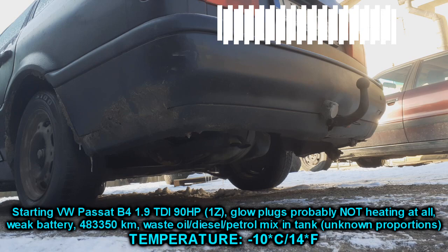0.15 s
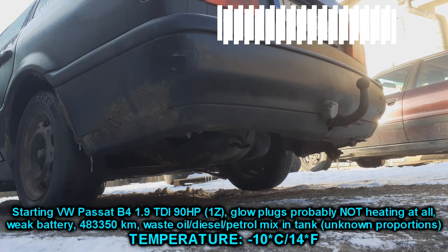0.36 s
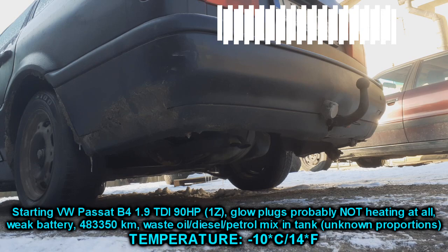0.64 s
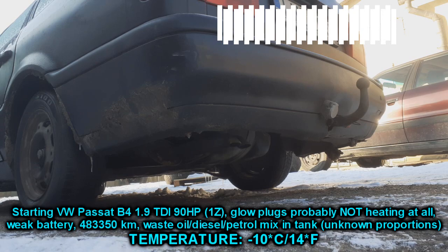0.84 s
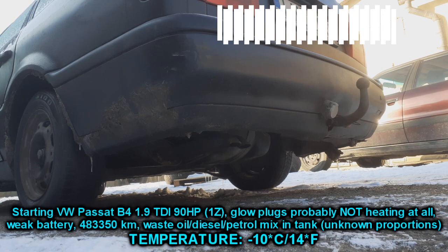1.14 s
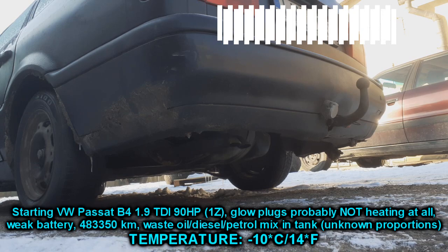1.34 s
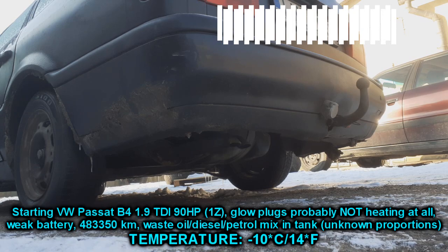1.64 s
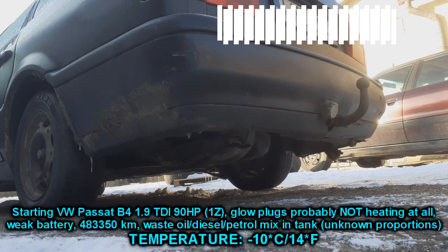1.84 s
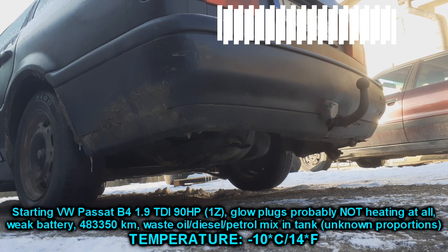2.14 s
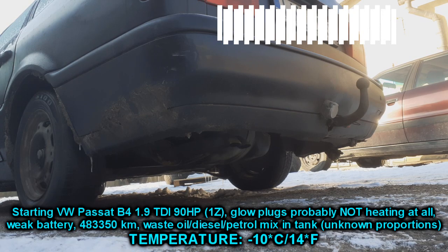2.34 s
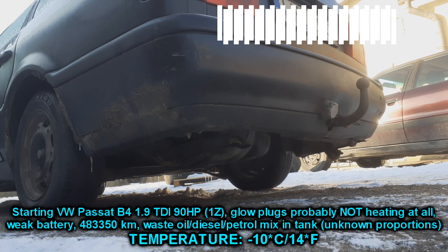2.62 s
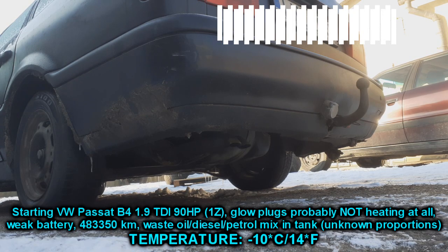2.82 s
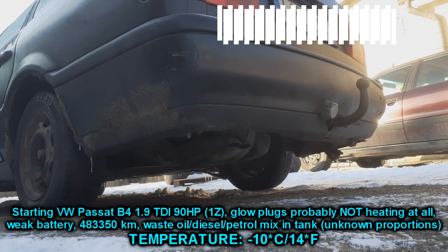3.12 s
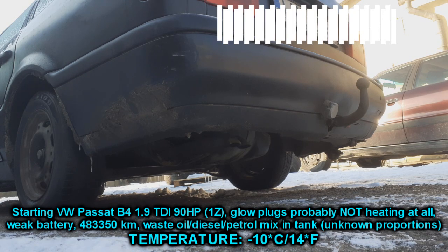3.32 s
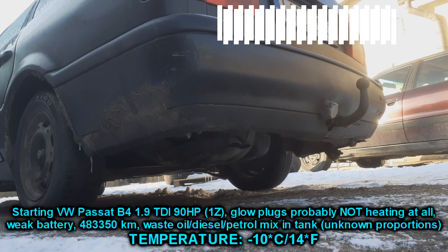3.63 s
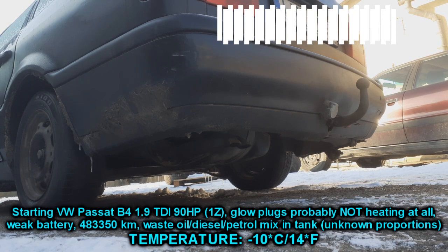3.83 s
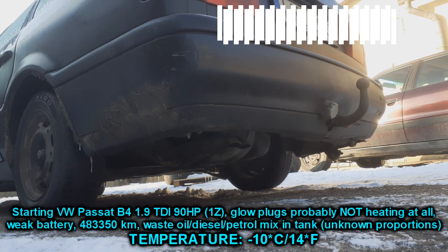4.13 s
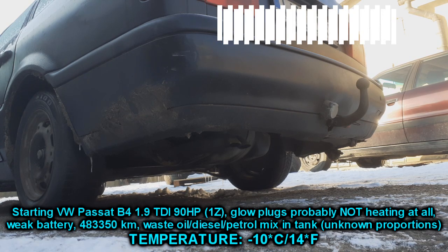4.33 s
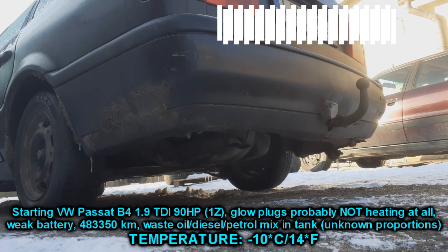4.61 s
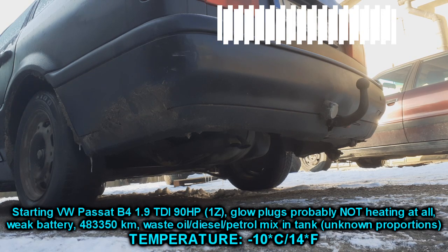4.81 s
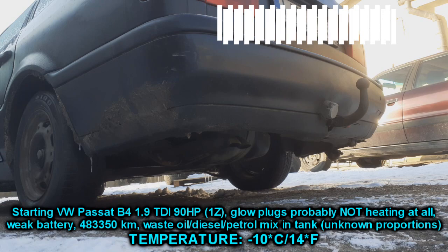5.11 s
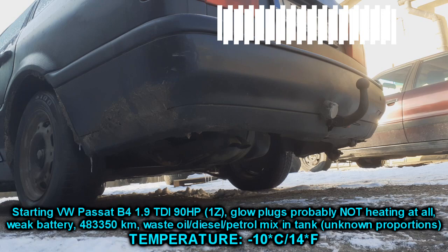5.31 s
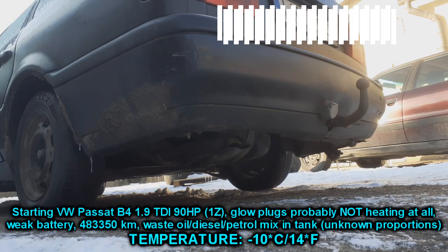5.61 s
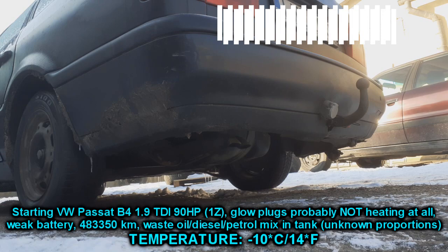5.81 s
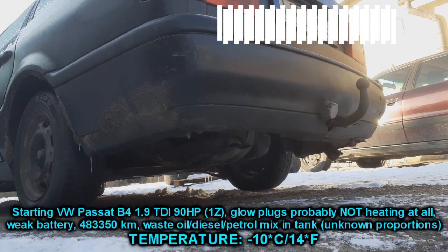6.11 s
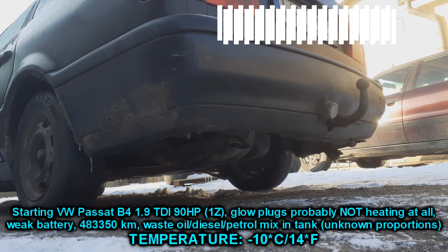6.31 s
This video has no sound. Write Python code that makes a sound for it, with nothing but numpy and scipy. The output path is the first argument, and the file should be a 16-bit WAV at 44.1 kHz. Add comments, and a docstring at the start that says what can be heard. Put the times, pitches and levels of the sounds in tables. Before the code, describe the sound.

Heard outdoors from low behind a diesel car, faint traffic hums while someone shifts about in the cabin with dull bumps and rustles. Keys tick in the ignition. The starter suddenly clacks in and turns the cold engine over in loud, slow, laboured pulses, its gears grinding and a thin whine rising and falling, without the engine ever firing.

```python
"""Dull knocks, rustling and key clicks from the cabin of a frozen diesel car, heard low behind its bumper.
Then the starter pinion slams into the ring gear and cranks slowly. Each compression loads and slows
the gears, which grind loudly and ring the block, then spin up again with a thin whine.
Distant traffic murmurs throughout."""
import sys
import numpy as np
from scipy import signal
from scipy.fft import rfft, irfft, next_fast_len
from scipy.io import wavfile
from scipy.ndimage import map_coordinates

SR = 44100
rng = np.random.default_rng(int(sys.argv[2]) if len(sys.argv) > 2 else 0)


def log_audio(samples):
    """Write samples as a 16-bit WAV file to the path given in sys.argv[1]."""
    # one column per channel
    frames = np.atleast_2d(samples).T
    # limit to full scale, then quantise
    limited = np.clip(frames, -1, 1)
    pcm = np.round(limited * 32767).astype(np.int16)
    wavfile.write(sys.argv[1], SR, pcm)


N = 284533
TIME_S = np.arange(N) / SR


# turning engine: freq_hz, gain_db
ENGINE_SPECTRUM = [(25, -28), (60, 0), (130, -3), (185, 2), (360, 0), (600, -7), (1000, -37.5)]

def starter():
    """Cranking: tooth rate and gear load drive grind and whine; the rumble follows the load."""
    tooth_hz = crank_speed()
    load_db = gear_load(onset_s=0.004, drop_s=0.019)
    running = amp(curve([(4.525, -57), (4.56, -1), (4.58, 3), (6.5, 3.5)], outside=-120))
    teeth = np.cumsum(tooth_hz * (1 + 0.008 * wobble(150))) / SR
    speed_db = 20 * np.log10(tooth_hz / np.median(tooth_hz[running > 0.5]))
    rumble = amp(-58.5 + 0.36 * load_db) * noise(ENGINE_SPECTRUM)
    gears = grind(teeth, tooth_hz, load_db, speed_db) + whine(teeth, load_db, speed_db)
    return running * (gears + rumble) + clacks()


# unloaded starter speed, with early overshoot: time_s, tooth_hz
UNLOADED_SPEED = [(4.55, 60), (4.65, 295.9), (4.68, 364.4), (4.712, 379), (4.77, 351.4), (4.83, 322.2),
                  (5.15, 328.4), (6.45, 334.6)]
# gear loads, the pinion engaging first, then the compression strokes:
# bite_s, peak_s, release_s, speed_loss_ratio, bite_load_db, release_load_db
GEAR_LOADS = [(4.577, 4.6, 4.69, 0.03, 7, 0.5), (4.817, 5.055, 5.066, 0.55, 6.5, 7.5),
              (5.153, 5.3, 5.353, 0.47, 11, 5), (5.406, 5.555, 5.559, 0.44, 9, 7),
              (5.653, 5.772, 5.822, .46, 10, 6), (5.911, 6.06, 6.068, .46, 9.5, 6),
              (6.182, 6.32, 6.35, 0.44, 9.5, 5.5), (6.424, 6.58, 6.9, 0.54, 5, 14)]

def crank_speed(squeeze_power=2.1, recover_s=0.062):
    """Tooth rate in Hz: each load brakes the starter up to its peak, then lets it recover."""
    tooth_hz = curve(UNLOADED_SPEED)
    for bite_s, peak_s, _, loss, _, _ in GEAR_LOADS:
        squeeze = np.clip((TIME_S - bite_s) / (peak_s - bite_s), 0, 1) ** squeeze_power
        easing = np.exp(-(np.maximum(TIME_S - peak_s, 0) / recover_s) ** 2)
        tooth_hz *= 1 - loss * squeeze * easing
    return tooth_hz


def gear_load(onset_s, drop_s):
    """Load in dB: snaps on as the gears bite, drops as they let go."""
    load_db = np.zeros(N)
    for bite_s, _, release_s, _, first_db, last_db in GEAR_LOADS:
        onset = np.clip((TIME_S - bite_s) / onset_s + 0.5, 0, 1)
        release = np.clip((release_s - TIME_S) / drop_s + 0.5, 0, 1)
        load_db += onset * release * np.interp(TIME_S, [bite_s, release_s], [first_db, last_db])
    return load_db


def groan_gain(lead_s=0.019):
    """The groan builds until just before release, stronger the harder the load brakes."""
    return sum(loss * swell(release_s - lead_s, rise_s=0.33, fade_s=0.014, level_db=-29.5)
               for _, _, release_s, loss, _, _ in GEAR_LOADS)


# grinding gears: freq_hz, gain_db
GRIND_SPECTRUM = [(18, -41), (30, -12), (59, -6), (117, -14), (188, -3), (318, -3), (413, -8), (509, -5),
                  (883, -7), (1790, -20), (3540, -23.5), (6830, -34), (8870, -52), (12500, -38),
                  (15800, -45)]
# engine block and underbody resonances: freq_hz, width_hz, boost_db
BLOCK_MODES = [(56, 11, 4), (113.4, 4.7, 2), (161, 30, 3), (197, 20, 3.5), (268, 11, 4), (343.6, 39, 7),
               (507.6, 6.5, 10), (698, 16, 6), (753, 10, 8), (885, 64, 6), (1015, 29, 9.5), (1206, 12, 5),
               (2425, 17, 8), (2670, 27, 9)]

def grind(teeth, tooth_hz, load_db, speed_db):
    """Gear teeth hammer and scrape, ringing the block and underbody."""
    contacts = np.diff(np.floor(teeth), prepend=0)
    hits = contacts * amp(3.8 * rng.standard_normal(N)) * np.sqrt(SR / tooth_hz)
    pressure = unit(np.exp(-1.2 * (teeth % 1)) * amp(0.61 * wobble(110)))
    scrape = pressure * rng.standard_normal((2, N))
    force = unit(0.22 * scattered(hits, t60_s=0.05) + scrape)
    # load governs the low grind; the bright rasp also needs speed
    low_band = [(1100, -1), (1700, -10.5), (3000, -37.5)]
    rasp_band = [(700, -30), (1300, 4.5), (2000, 1), (4500, 2), (9000, -0.5), (13000, 0.5)]
    low = coloured(force * amp(load_db - 0.028 * speed_db), low_band)
    rasp = coloured(unit(scrape[::-1]) * amp(0.78 * load_db + 0.91 * speed_db - 0.3), rasp_band)
    filter_rms = np.std(coloured(rng.standard_normal(N), GRIND_SPECTRUM, BLOCK_MODES))
    return amp(-45.5) * coloured(low + rasp, GRIND_SPECTRUM, BLOCK_MODES) / filter_rms


# mesh tones: tooth_rate_multiple, free_db, whine_db, groan_db
MESH_ORDERS = [(2, 0.5, -6.5, -8), (3, -18, -6, -6.5), (4, -1, -6.5, -3), (8, -3, -6, -37),
               (12, -12, -2, -48)]
# starter housing: freq_hz, gain_db
HOUSING_SPECTRUM = [(150, -51), (320, 8.5), (450, -32), (650, 1.5), (760, -3), (900, 0), (1050, -6),
                    (1250, -4), (1500, -3.5), (1700, -6), (2000, -9), (2600, -9), (3000, -10), (3200, -24),
                    (3520, 1.5), (3750, -18), (5000, -55)]

def whine(teeth, load_db, speed_db, free_spin_s=4.735, free_width_s=0.046):
    """Mesh tones through the housing: singing when free, thin when fast, groaning under load."""
    free = amp(-41) * np.exp(-((TIME_S - free_spin_s) / free_width_s) ** 4)
    spin = amp(-46.5 + 0.18 * load_db + 0.93 * np.minimum(speed_db, 0))
    strain = groan_gain()
    shaken_teeth = teeth + 0.014 * wobble(260)  # gear play roughens the high orders most
    tones = np.zeros(N)
    for order, free_db, whine_db, groan_db in MESH_ORDERS:
        gain = free * amp(free_db) + spin * amp(whine_db) + strain * amp(groan_db)
        chatter = amp(4.86 * wobble(110) - 4.5)
        tones += gain * chatter * np.sin(2 * np.pi * order * shaken_teeth + 0.5 * wobble(110))
    direct, echo = scattered(coloured(tones, HOUSING_SPECTRUM), t60_s=0.064)
    bounce = 0.89 * np.roll(echo, SR // 100)  # off a nearby car; beats against the gliding tones
    return np.array([direct + bounce, echo])


# starter clacks, the solenoid and the pinion striking: start_s, level_db
STARTER_CLACKS = [(4.566, -42), (4.5756, -31), (4.59, -31), (4.821, -35.5), (4.8368, -33.5), (5.1507, -48),
                  (5.4056, -43), (5.6571, -36.5), (5.9175, -38), (6.118, -44.5), (6.1809, -49)]

def clacks():
    """The solenoid clacks, the pinion slams into the ring gear, and again as the backlash closes."""
    steel = [(400, -10), (1200, 2), (2600, 2), (4000, -3), (7000, -9.5), (9000, -30),
             (12500, -13.5), (16000, -26)]
    out = np.zeros((2, N))
    for start_s, level_db in STARTER_CLACKS:
        strike = burst(steel, t60_s=0.074, tail_db=-22, tail_t60_s=0.32, attack_s=0.00088)
        add(out, start_s, amp(level_db - 8) * strike)
    return out


# cabin blows: start_s, level_db, boom_db, rap_db
CABIN_BLOWS = [(0.536, -46.5, -4, -27), (0.587, -42, -7, -11), (0.614, -43, -9, -18),
               (0.667, -54.5, 8.5, 3), (0.707, -31, -24, -16), (0.723, -37.5, -11.5, -31),
               (0.931, -48.5, -23.5, -24), (0.957, -47.5, -13, -29), (1.008, -52.5, 2, -27),
               (1.24, -40.5, -7.5, -44), (1.39, -46.5, -11, -27), (1.611, -39, -7, -22),
               (1.639, -30.5, -20.5, -29), (2.117, -50, -35, -8), (2.792, -50.5, -6.5, -16),
               (3.584, -36.5, -9.5, -22), (3.648, -28.5, -30, -17), (3.663, -33, -13.5, -30),
               (3.794, -33.5, -5.5, -21.5), (3.816, -29, -17, -19), (3.842, -32, -8.5, -25)]
# body panels, low boom, hollow rap: freq_hz, gain_db
PANEL_SPECTRUM = [(50, -26), (110, -5), (190, 3), (260, 5.5), (340, 2), (450, -1), (620, -1.5), (760, -12),
                  (1000, -23), (1300, -50), (2400, -86)]
BOOM_SPECTRUM = [(25, -43.5), (55, -9), (80, -3.5), (115, -4), (170, -8), (400, -63)]
RAP_SPECTRUM = [(400, -41), (750, 6.5), (1050, 11), (1400, 2.5), (1900, -15.5), (2700, -12.5), (5000, -48),
                (9000, -61)]
# cabin panel resonances: freq_hz, width_hz, boost_db
CABIN_MODES = [(114.4, 11, 8), (246.5, 23, 4), (346.5, 30, 8), (459, 24, 7), (637, 80, 0.5), (977, 66, 0),
               (1405, 110, 8.5), (1750, 66, 11), (2067, 100, 11.5)]

def knocks():
    """Padded blows ring the body panels, with a boom below and a hollow rap above."""
    out = np.zeros((2, N))
    for start_s, level_db, boom_db, rap_db in CABIN_BLOWS:
        panels = burst(PANEL_SPECTRUM, CABIN_MODES,
                       t60_s=0.065, tail_db=-13.5, tail_t60_s=0.31, attack_s=0.0015)
        boom = burst(BOOM_SPECTRUM, CABIN_MODES, t60_s=0.1, tail_db=-6, tail_t60_s=0.52, attack_s=0.0026)
        rap = burst(RAP_SPECTRUM, CABIN_MODES,
                    t60_s=0.13, tail_db=-19.5, tail_t60_s=0.48, attack_s=0.0023)
        blow = amp(-2) * panels + amp(boom_db - 2.5) * boom + amp(rap_db - 4) * rap
        add(out, start_s, amp(level_db) * blow)
    return out


# key clicks: start_s, level_db, ping_db, lock_db
KEY_CLICKS = [(2.0354, -61, -5, -6), (2.0705, -58, -10, -1), (2.102, -54.5, -16, -1.5),
              (2.1211, -50, -5.5, 1), (2.3276, -53.5, -5, 0), (2.7928, -59.5, -20, -0.5),
              (2.97, -64.5, 4, -2), (3.016, -59.5, 6.5, 0.5), (3.085, -52, -2, -11), (3.576, -60, 1, -5),
              (4.139, -53, -30, -11), (4.339, -56.5, -6, 1), (4.362, -55, -5, 0.5), (4.385, -49.5, 0, -7.5)]
# key tick, ignition lock, high ping: freq_hz, gain_db
TICK_SPECTRUM = [(3000, -37), (5200, -5.5), (6600, 1.5), (7700, -5.5), (9200, -37)]
LOCK_SPECTRUM = [(500, -10), (1200, -1), (1800, -12.5), (2700, -8.5), (3800, 0), (5500, -6.5), (7800, -14),
                 (9200, -55), (12400, -34)]
PING_SPECTRUM = [(8000, -50), (11000, -6), (13500, 1), (16000, -1.5)]

def keys():
    """Keys tick, ping and knock the lock, each click with resonances of its own."""
    out = np.zeros((2, N))
    for start_s, level_db, ping_db, lock_db in KEY_CLICKS:
        modes = [(hz, 500, 4) for hz in rng.uniform(3360, 7400, size=3)]
        tick = burst(TICK_SPECTRUM, modes, t60_s=0.022, tail_db=-15, tail_t60_s=0.2, attack_s=0.0004)
        lock = burst(LOCK_SPECTRUM, modes, t60_s=0.024, tail_db=-10.5, tail_t60_s=0.28)
        ping = burst(PING_SPECTRUM, t60_s=0.022, tail_db=-13.5, tail_t60_s=0.24)
        click = amp(-5.5) * tick + amp(lock_db - 6.5) * lock + amp(ping_db - 3) * ping
        add(out, start_s, amp(level_db) * click)
    return out


# clothing brushes: peak_s, rise_s, fade_s, level_db, hiss_db
CLOTH_BRUSHES = [(0.626, 0.068, 0.077, -64, -14), (0.672, 0.018, 0.088, -65.5, -9),
                 (1.242, 0.032, 0.046, -74, 2), (1.315, 0.092, .15, -79, 8), (1.378, 0.02, 0.082, -60, -24),
                 (1.61, 0.45, 0.13, -67, -5)]
# rubbing cloth and its fine hiss: freq_hz, gain_db
CLOTH_SPECTRUM = [(590, -52), (1000, 1), (1150, -6), (1720, -20), (2050, -6.5), (3100, -10), (4190, -5),
                  (6570, -3), (8570, -26), (13400, -15), (15800, -15)]
HISS_SPECTRUM = [(8000, -45), (11000, -10), (13500, 0), (15800, -7)]

def clothes():
    """Brushing cloth rustles, with a fine hiss on top."""
    rubbing = swells(row[:-1] for row in CLOTH_BRUSHES)
    hissing = swells((*timing, level_db + hiss_db) for *timing, level_db, hiss_db in CLOTH_BRUSHES)
    flicker = amp(0.5 + 1.2 * wobble(120))
    return flicker * (rubbing * noise(CLOTH_SPECTRUM) + hissing * noise(HISS_SPECTRUM))


# weight shifts: peak_s, rise_s, fade_s, level_db
WEIGHT_SHIFTS = [(0.61, 0.11, .25, -52.5), (0.955, 0.11, 0.12, -58.5), (1.27, 0.1, 0.31, -57.5),
                 (1.35, 0.074, 0.13, -57.5), (1.66, .55, 0.11, -57), (2.84, .07, 0.07, -64),
                 (3.6, 0.42, 0.31, -59), (3.87, .15, 0.23, -48.5)]

def seat():
    """Shifting weight shakes the seat."""
    shaking = amp(2.2 * wobble(35)) * swells(WEIGHT_SHIFTS)
    return shaking * (noise(PANEL_SPECTRUM) + amp(-13) * noise(BOOM_SPECTRUM))


# trim squeaks: start_s, length_s, start_hz, end_hz, level_db
TRIM_SQUEAKS = [(0.542, 0.046, 960, 996, -57), (1.376, 0.102, 1125, 1197, -62)]

def trim():
    """Plastic trim squeaks in short, rough, rising tones."""
    out = np.zeros(N)
    for start_s, length_s, start_hz, end_hz, level_db in TRIM_SQUEAKS:
        count = int(length_s * SR)
        pitch_hz = np.linspace(start_hz, end_hz, count) * (1 + 0.035 * wobble(302)[:count])
        phase = 2 * np.pi * np.cumsum(pitch_hz) / SR
        grip = np.hanning(count) * amp(3 * wobble(139)[:count])
        add(out, start_s, amp(level_db) * grip * (np.sin(phase) + 0.13 * np.sin(2 * phase)))
    return scattered(out, t60_s=0.074)


# traffic murmur, tyre noise: freq_hz, gain_db
MURMUR_SPECTRUM = [(15, -45), (25, -11.5), (70, -3), (126, -4.5), (144, -5.5), (179, -1.5), (276, -3.5),
                   (361, -3.5), (572, -10), (620, -10.5), (1010, -31.5), (1640, -33), (5670, -34.5),
                   (7630, -44), (15800, -29)]
TYRE_SPECTRUM = [(500, -38.5), (850, -2), (1030, -5), (1250, -17), (2000, -42)]
# passing tyres: peak_s, rise_s, fade_s, level_db
TYRE_PASSES = [(2.55, 0.22, .4, -74), (3.5, 0.34, 2.4, -73)]
# far whir: time_s, pitch_hz
WHIR_PITCH = [(2.15, 739), (2.4, 717), (2.95, 770), (3.2, 896), (3.55, 922)]

def street():
    """Far traffic: a low murmur over faint hiss, tyres that swell and fade, a faint rising whir."""
    murmur = amp(-64.5 + 0.11 * wobble(2.9)) * noise(MURMUR_SPECTRUM)
    tyres = np.hypot(amp(-88.5), swells(TYRE_PASSES)) * noise(TYRE_SPECTRUM)
    phase = 2 * np.pi * np.cumsum(curve(WHIR_PITCH) * (1 + 0.02 * wobble(120))) / SR
    whir = swell(3.3, rise_s=3.9, fade_s=4.0, level_db=-78) * amp(3.4 * wobble(14)) * np.sin(phase)
    return murmur + tyres + scattered(whir, t60_s=0.2)


def amp(db):
    """Decibels to gain."""
    return 10 ** (np.asarray(db) / 20)


def unit(x):
    """x at rms 1."""
    return x / np.sqrt(np.mean(x ** 2) + 1e-20)


def along(points, hz):
    """(freq_hz, value) points interpolated on a log axis."""
    points_hz, values = np.transpose(points)
    return np.interp(np.log(hz + 1), np.log(points_hz + 1), values)


def curve(rows, outside=None):
    """(time_s, value) rows as one value per sample."""
    return np.interp(TIME_S, *np.transpose(rows), left=outside, right=outside)


def wobble(rate_hz):
    """Smooth random curve, rate_hz knots a second."""
    knots = rng.standard_normal(int(N * rate_hz / SR) + 4)
    return map_coordinates(knots, [TIME_S * rate_hz])


def swell(peak_s, rise_s, fade_s, level_db):
    """Gain that climbs 20 dB per rise_s up to peak_s, then sinks 20 dB per fade_s."""
    t = TIME_S - peak_s
    return amp(level_db - 20 * np.maximum(-t / rise_s, t / fade_s))


def swells(rows):
    """Power sum of overlapping swells."""
    return np.sqrt(sum(swell(*row) ** 2 for row in rows))


def coloured(x, spectrum, modes=()):
    """Minimum-phase filter: a broad (freq_hz, gain_db) spectrum with resonances on top."""
    size = 2 * next_fast_len(x.shape[-1] // 2 + 4096)
    hz = np.fft.rfftfreq(size, 1 / SR)
    modes_db = sum(boost_db / (1 + (2 * (hz - mode_hz) / width_hz) ** 2)
                   for mode_hz, width_hz, boost_db in modes)
    cepstrum = irfft(np.log(amp(along(spectrum, hz) + modes_db)))
    cepstrum[1:size // 2] *= 2
    cepstrum[size // 2 + 1:] = 0
    return irfft(rfft(x, size) * np.exp(rfft(cepstrum)), size)[..., :x.shape[-1]]


def noise(spectrum):
    """Direct and scattered noise at rms 1."""
    return unit(coloured(rng.standard_normal((2, N)), spectrum))


def scattered(x, t60_s):
    """Two rows: x and its echo from the ground and nearby cars."""
    t = np.arange(SR // 4) / SR
    tail = rng.standard_normal(len(t)) * amp(-60 * t / t60_s)
    return np.array([x, signal.fftconvolve(x, tail / np.linalg.norm(tail))[:N]])


def burst(spectrum, modes=(), *, t60_s, tail_db, tail_t60_s, attack_s=0.00058):
    """One blow on a body with crowded modes: a fast decay and a weak long one."""
    t = np.arange(SR // 2) / SR
    decay = amp(-60 * t / t60_s) + amp(tail_db - 60 * t / tail_t60_s)
    envelope = decay * (1 - np.exp(-t / attack_s))
    ring = coloured(rng.standard_normal((2, len(t))) * envelope, spectrum, modes)
    return ring * np.linalg.norm(envelope) / np.linalg.norm(ring, axis=1, keepdims=True)


def add(track, start_s, sound):
    """Mix a sound into the track at start_s."""
    part = track[..., round(start_s * SR):][..., :sound.shape[-1]]
    part += sound[..., :part.shape[-1]]


def placed(pair, coherence, balance, left_lead_s):
    """Direct and scattered rows to stereo, keeping the colour of the left-right sum."""
    size = next_fast_len(N + SR // 4)
    hz = np.fft.rfftfreq(size, 1 / SR)
    angle = np.arccos(np.clip(along(coherence, hz), 0, 1)) / 2
    direct, diffuse = rfft(pair, size) * [np.cos(angle), np.sin(angle)]
    left = amp(along(balance, hz) / 2) * np.exp(1j * np.pi * hz * left_lead_s)
    right = 1 / left
    mid_gain = np.hypot(np.abs(left + right) * np.cos(angle), np.abs(left - right) * np.sin(angle)) / 2
    stereo = np.array([left * (direct + diffuse), right * (direct - diffuse)])
    return irfft(stereo / mid_gain, size)[:, :N]


# left-right likeness: freq_hz, coherence_ratio
CAR_COHERENCE = [(60, 0.99), (350, 0.99), (550, 0.9), (900, 0.5), (1200, 0.15), (3500, 0.14), (7000, 0.073),
                 (15000, 0.096)]
STREET_COHERENCE = [(60, .92), (260, 0.93), (620, 0.38), (1030, 0.7), (1400, 0.046)]
# stereo balance: freq_hz, left_minus_right_db
CAR_BALANCE = [(60, 6.5), (900, 6), (1300, 6.5), (2500, 8.5), (5500, 4.5), (7500, 21.5), (15000, 14)]
STREET_BALANCE = [(60, 11.5), (400, 6.5), (700, 9), (1500, 4.5), (6000, 1.5), (15000, 0.5)]

def scene():
    """The car stands to the left; the far traffic is louder on the left but reaches the right first."""
    car = knocks() + keys() + clothes() + seat() + trim() + starter()
    near = placed(car, CAR_COHERENCE, CAR_BALANCE, left_lead_s=0.00033)
    far = placed(street(), STREET_COHERENCE, STREET_BALANCE, left_lead_s=-0.00025)
    return near + far


def record(dry):
    """Roll off the deepest bass and cut everything above the band limit."""
    low_cut_hz, top_hz = 39, 15850
    size = next_fast_len(N + SR // 4)
    hz = np.fft.rfftfreq(size, 1 / SR)
    low_cut = 1 / np.sqrt(1 + (low_cut_hz / (hz + 1)) ** 6)
    return irfft(rfft(dry, size) * low_cut * (hz < top_hz), size)[:, :N]


dry = scene()
out = record(dry)
log_audio(out)
```